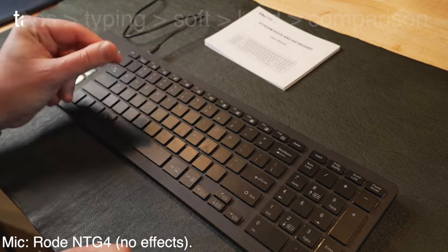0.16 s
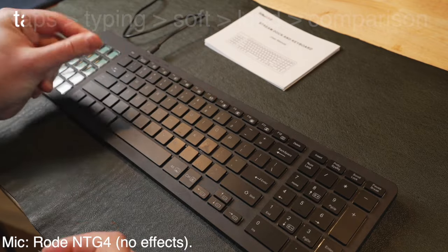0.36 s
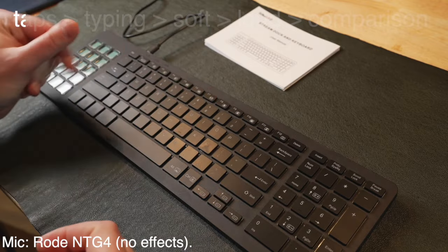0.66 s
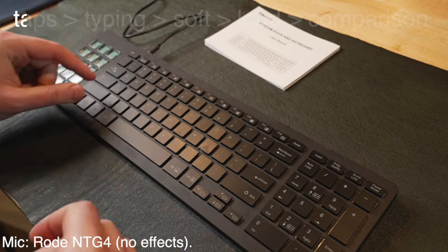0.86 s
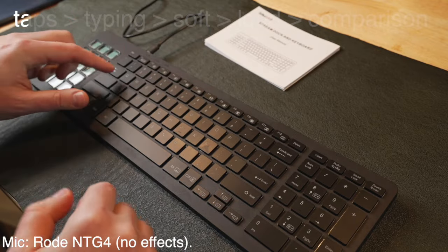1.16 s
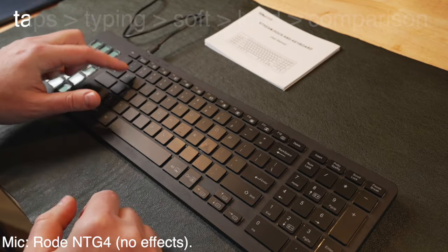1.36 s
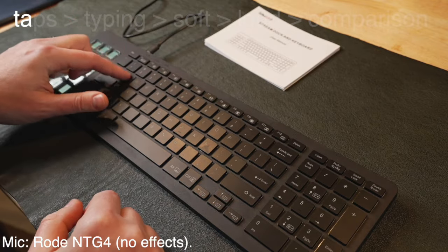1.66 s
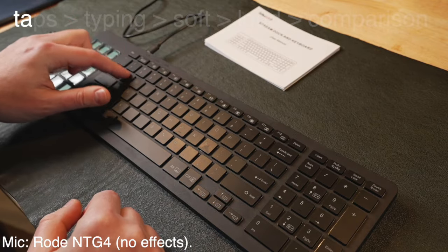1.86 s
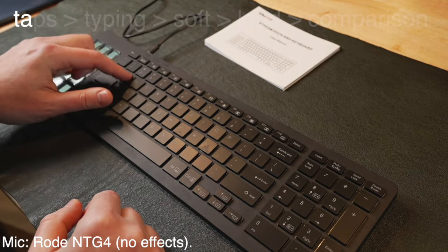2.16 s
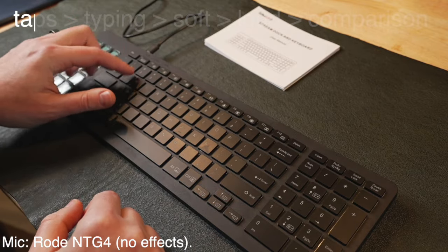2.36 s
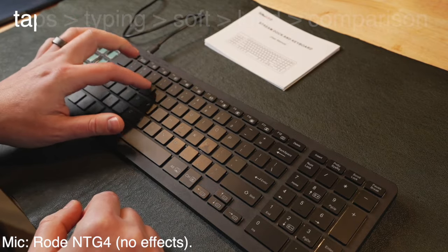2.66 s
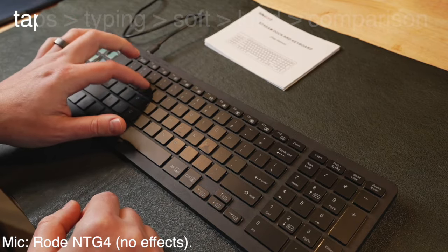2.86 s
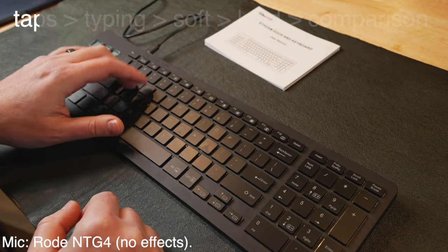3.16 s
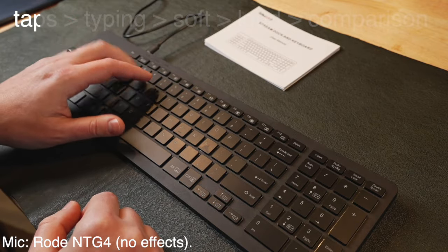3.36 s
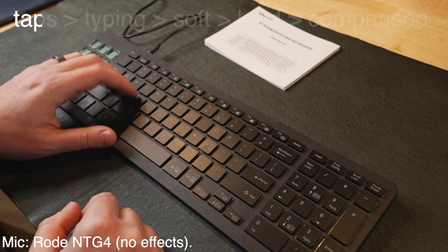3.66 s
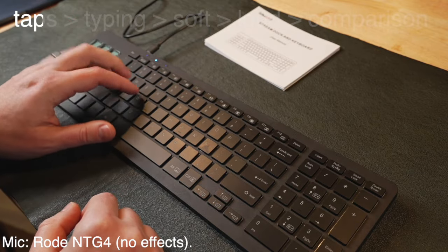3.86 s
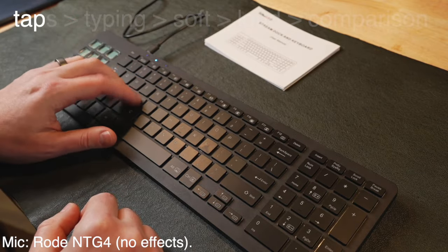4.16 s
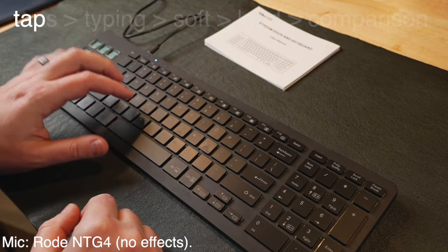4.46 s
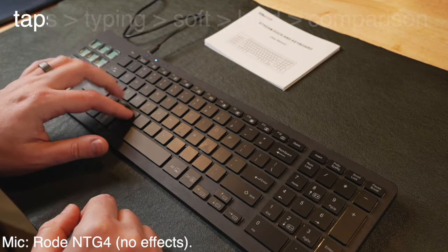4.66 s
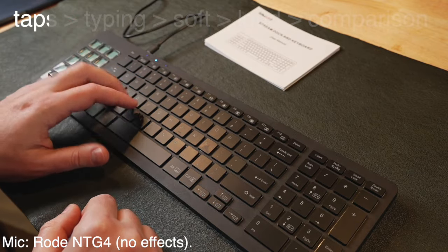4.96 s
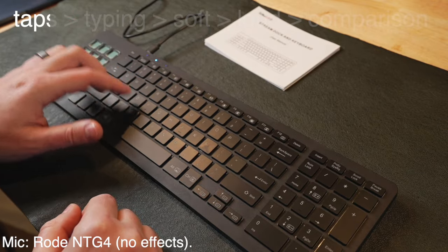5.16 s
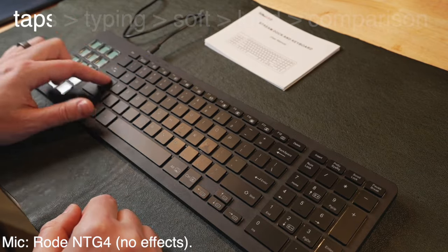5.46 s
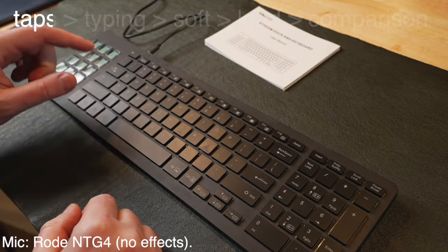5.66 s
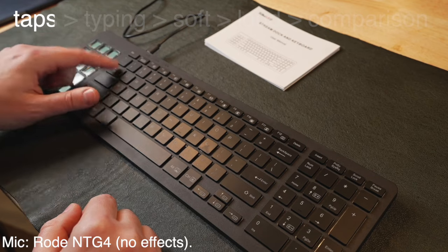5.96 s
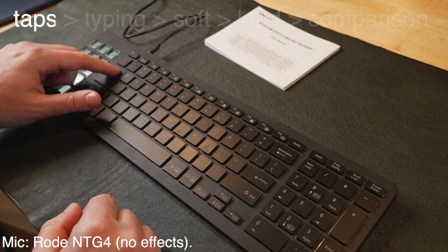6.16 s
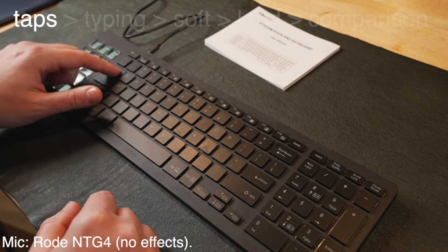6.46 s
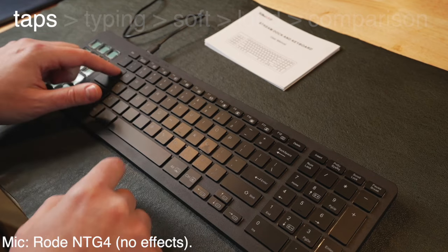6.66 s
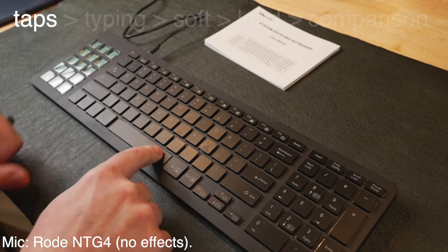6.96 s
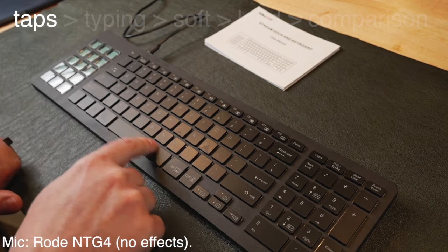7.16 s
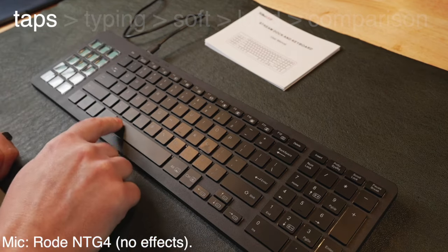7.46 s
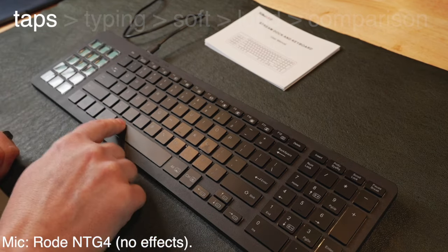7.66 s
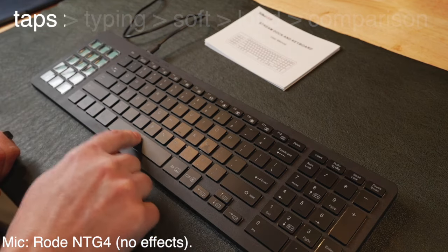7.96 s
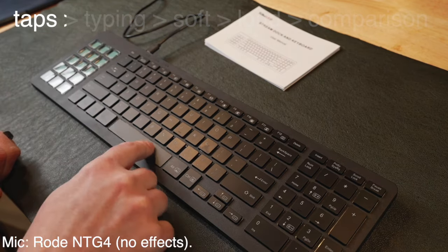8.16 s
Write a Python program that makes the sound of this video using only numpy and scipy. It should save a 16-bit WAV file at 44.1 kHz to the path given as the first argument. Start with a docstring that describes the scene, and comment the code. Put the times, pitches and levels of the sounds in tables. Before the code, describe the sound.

Three sharp finger snaps, a faint hand brush, then low-profile keyboard keys tapped softly, harder in quick rolls, and a rattling space bar, close and dry.

```python
"""Three finger snaps, each after a soft press of the fingers, crack against the palm and ring its hollow.
A hand brushes over the desk mat; then keys of a low-profile keyboard are tapped, first softly one by one,
then harder in quick rolls of several fingers: touch, bottoming out that shakes case and desk, spring back.
A wide key follows, and last the long space bar, rattling on its wire. Clicks are coloured noise bursts and
bodies are decaying sines. One close microphone in a small, dry room with still air and a faint mains hum."""
import sys
import numpy as np
from scipy import signal
from scipy.fft import rfft, irfft
from scipy.io import wavfile
from scipy.ndimage import uniform_filter1d

SR = 44100
rng = np.random.default_rng(int(sys.argv[2]) if len(sys.argv) > 2 else 0)


def int16_out(signal):
    """Quantize to a 16-bit WAV file."""
    q = np.round(np.clip(np.atleast_2d(signal).T, -1, 1) * 32767)
    wavfile.write(sys.argv[1], SR, q.astype(np.int16))


N = 366471  # samples

# Click levels are energies: 0 dB is one millisecond at full level.
# Brightness is the treble tilt in dB for each factor of five in frequency, pivoting at 5 kHz.
# keys bottom out: [t/s, click level/dB, brightness/dB, relative case knock level/dB, knock f/Hz]
KEY_STRIKES = [(1.4359, -24.5, -1.5, -42, 411), (1.6739, -21.5, 4, -42, 400), (1.8343, -33, -9, -46.5, 420),
               (2.0006, -33.5, -4.5, -46, 413), (2.135, -27, -5.5, -44, 410),
               (2.2836, -33.5, -16, -49, 408), (2.5637, -27, -17, -38.5, 691), (2.7518, -34, 2, -43.5, 720),
               (2.9316, -36, -6, -45, 690), (3.129, -14, -2.5, -33, 433), (3.1841, -24.5, -8, -38.5, 360),
               (3.2347, -33.5, 17, -40, 716), (3.3882, -15.5, -0.5, -38, 420), (3.4236, -30, 0, -44, 407),
               (3.6601, -17, 9, -42, 388.5), (3.7014, -12, 7, -28.5, 770), (3.916, -13, 7.5, -31, 683),
               (3.9472, -16.5, -0.5, -38, 750), (4.1409, -17, 0, -32.5, 754), (4.1806, -28.5, -3, -46, 364),
               (4.218, -29, -8, -46.5, 714), (4.533, -12, 0.5, -29, 725), (4.569, -23.5, 0.5, -44, 365),
               (4.7831, -17.5, -8, -35, 714), (4.8212, -22.5, 2.5, -48, 371),
               (4.993, -25.5, -4.5, -49, 700), (5.0617, -28.5, -10.5, -47, 744),
               (5.4365, -10.5, -0.5, -27.5, 755), (6.0231, -27, -2, -42, 404),
               (6.1834, -32.5, 5, -47.5, 720), (6.3469, -33.5, 6, -51, 446), (6.503, -38, -2, -49, 460),
               (6.652, -33.5, 2, -46.5, 762)]
# keys reach the top stop: [t/s, click level/dB, relative brightness/dB, relative cap ring level/dB]
KEY_RETURNS = [(1.5481, -45.5, 10, -51), (1.759, -45, 15, -51.5), (1.9078, -38, 0, -46.5),
               (2.058, -41, 16, -51.5), (2.2033, -35.5, 14, -63), (2.2279, -34.5, 24, -46.5),
               (2.3795, -31, 10, -40.5), (2.6676, -37.5, 13, -47), (2.855, -37.5, 5, -43),
               (3.048, -47.5, 0, -47.5), (3.2943, -41.5, 23, -45), (3.3337, -40, 10, -44.5),
               (3.4546, -34, 20, -44.5), (3.5011, -31, 5.5, -48), (3.5202, -35.5, 16, -44.5),
               (3.543, -42.5, -6, -43), (3.767, -39, -2, -48), (3.8137, -44.5, 6, -48.5),
               (3.8566, -44, 7, -50), (4.0195, -41, 0, -53), (4.043, -35.5, 14, -45),
               (4.27, -42.5, -4, -45), (4.291, -39.5, 15, -46.5), (4.32, -42.5, 6, -47.5),
               (4.6092, -33, 5, -52), (4.657, -29, 7, -43.5), (4.7243, -40, 12, -50.5),
               (4.866, -38, 0, -52), (4.9128, -32.5, 16, -43.5), (4.9549, -38, 13, -47.5),
               (5.0334, -22, 15.5, -49.5), (5.1472, -21, 10.5, -38.5), (5.532, -30, -2.5, -47.5),
               (6.1046, -41, 6, -54.5), (6.2745, -46, 5, -52.5), (6.424, -47.5, 19, -55.5),
               (6.59, -51, 3, -52), (6.717, -37, 11, -53.5)]
# space bar presses: [down t/s, click level/dB, relative knock level/dB, wire slack/ms,
#                     up t/s, click level/dB]
BAR_PRESSES = [(6.9859, -15, -30.5, 5.9, 7.058, -26), (7.1463, -20.5, -47, 8.7, 7.2139, -23.5),
               (7.299, -28, -55, 10.7, 7.338, -33), (7.4374, -23.5, -40, 13.2, 7.5016, -29.5),
               (7.5694, -26, -36, 16.6, 7.6475, -27.5), (7.7142, -22, -54, 11.9, 7.790, -20.5),
               (7.8719, -18, -30, 6.2, 7.9526, -28), (8.025, -24.5, -51, 9.5, 8.112, -29),
               (8.1704, -28.5, -49, 19.5, 8.245, -24), (8.316, -18, -45, 10, 8.39, -29)]
# finger snaps: [t/s, level/dB, brightness/dB, palm hollow f/Hz, hollow level relative to the snap/dB]
FINGER_SNAPS = [(.1270, -13.5, 3.5, 2060, -2), (0.3768, -9, -0.5, 2290, 5), (0.6283, -6.5, -0.5, 2280, 2.5)]
# colour of a plastic key cap, also lent to soft finger contacts: [f/Hz, level/dB]
CAP_COLOUR = [(100, -24), (400, -9.5), (800, 1.5), (1200, -7), (1800, -0.5), (2600, -2), (3300, -1.5),
              (4500, 0.5), (6500, 1.5), (8500, -2.5), (10500, -11.5), (13000, -7), (16000, -13)]

# a blow of middling force, from which other blows are reckoned
USUAL_CLICK_DB, USUAL_KNOCK_DB = -28, -43
WIDE_FROM_S = 5.9  # from here on a wide key is tapped
WIDE_TRAVEL = 1.9  # times the travel and lift time of a narrow key


def amp(db):
    """Decibels to gain."""
    return 10 ** (np.asarray(db) / 20)


def read(points, hz):
    """A table's value at hz, on a log-frequency axis."""
    f, value = np.transpose(points)
    return np.interp(np.log(hz + 1), np.log(f), value)


def add(mix, s, sound):
    """Mixes a sound in at time s."""
    part = mix[max(round(s * SR), 0):][:len(sound)]
    part += sound[:len(part)]


def unit_energy(x):
    """Scales x to the energy of one millisecond at full level."""
    return x / np.sqrt(np.sum(x ** 2) * 1000 / SR + 1e-20)


def coloured_noise(colour):
    """Steady noise shaped to a table of levels in dB per Hz."""
    hz = np.fft.rfftfreq(N, 1 / SR)
    return irfft(rfft(rng.standard_normal(N)) * amp(read(colour, hz)), N) * np.sqrt(SR / 2)


def by_force(db, usual, halves_db):
    """A duration that halves whenever the blow gets halves_db harder."""
    return usual * 2 ** ((USUAL_CLICK_DB - db) / halves_db)


def ring(modes, size=13000):
    """Struck modes, each dying at its own speed and a little different at every blow."""
    t = np.arange(size) / SR
    hz, db, t60 = np.transpose(modes)[:, :, None]
    detune, uneven = rng.standard_normal((2, len(modes), 1))
    decay = amp(db + 0.5 * uneven - 60 * t / t60)
    return (decay * np.sin(2 * np.pi * hz * (1 + 0.0046 * detune) * t)).sum(0)


def click(s, db, fade_ms, bright_db, colour, size=2048, grain_db=2.5, impact=1, spot_db=1.2):
    """One contact: a sharp impact in a burst of tiny chatter, coloured by the part struck."""
    start = size // 4
    ms = (np.arange(size) - start) * 1000 / SR
    fade_ms = max(fade_ms, 0) + 0.23  # even the hardest contact takes a moment
    shape = np.exp(np.where(ms < 0, ms / (0.43 * fade_ms), -ms / fade_ms).clip(-60, 0))
    grain = amp(grain_db * rng.standard_normal(size))
    chatter = unit_energy(shape * rng.standard_normal(size) * grain)
    chatter[start] += impact

    # the chatter drives all broad bands alike; only its fine ripple differs from blow to blow
    drive = rfft(chatter)
    drive = drive / np.sqrt(uniform_filter1d(abs(drive) ** 2, size=90) + 1e-12)
    hz = np.fft.rfftfreq(size, 1 / SR)
    tilt_db = bright_db * np.log(np.clip(hz, 1500, 12000) / 5000) / np.log(5)
    # each spot that is struck favours resonances of its own
    spot = np.interp(np.sqrt(hz / hz[-1]), np.linspace(0, 1, 24), rng.standard_normal(24))
    gain = amp(read(colour, hz) + tilt_db + spot_db * spot)
    # minimum phase: the resonances of the part ring after the contact
    phase = -signal.hilbert(np.log(np.r_[gain, gain[-2:0:-1]])).imag
    sound = irfft(drive * gain * np.exp(1j * phase[:len(hz)]))
    return s - start / SR, amp(db) * unit_energy(sound)


def knock(hz, db):
    """The plastic case rings briefly under the key."""
    # modes of the case: [multiple of the knock f, level/dB, t60/s]
    case_modes = [(.58, -26.5, 0.03), (1, -0.5, 0.025), (1.36, -8, 0.014), (1.85, -8, 0.017)]
    return amp(db) * ring([(k * hz, level, t60) for k, level, t60 in case_modes], size=5000)


def thud(db, swell_s=0.019):
    """The blow sinks through the mat and sets the desk going."""
    # modes of the keyboard on its desk: [f/Hz, level/dB, t60/s]
    desk_modes = [(32.1, -6, 0.8), (48.9, 11.5, 0.1), (77.6, 4.5, 0.15), (91.4, 1, 0.21),
                  (165.4, 10, 0.062), (181.4, -6, 0.29), (195.3, 1.5, 0.18), (270, -8, 0.047),
                  (405, -4, 0.1), (453.6, -0.5, 0.056), (561, -17, .09), (730.5, -5, 0.11)]
    sound = ring(desk_modes)
    return -amp(db) * sound * (1 - np.exp(-np.arange(len(sound)) / SR / swell_s))


def strikes(knock_db=7, rasp_db=-13, rasp_lead_s=0.0046):
    """Keys rasp down their hinges and hit the bottom: click, knock of the case, thud of the desk."""
    out = np.zeros(N)
    for s, db, bright_db, case_db, hz in KEY_STRIKES:
        add(out, *click(s - rasp_lead_s, db + rasp_db, 0.6, 1.2, CAP_COLOUR))
        contact_ms = by_force(db, usual=1, halves_db=12)  # harder blows make shorter contact
        add(out, *click(s, db, contact_ms, bright_db, CAP_COLOUR))
        add(out, s - .001, knock(hz, case_db + knock_db))
        thud_db = -43 + 0.48 * (db - USUAL_CLICK_DB) + 0.21 * (case_db - USUAL_KNOCK_DB)
        add(out, s, thud(thud_db))
    return out


def returns(ring_db=5, cap_t60=0.068, thud_db=-6, tilt_db=-1, scatter=0.086):
    """Freed caps spring up and ring hollow, with no finger to damp them."""
    out = np.zeros(N)
    for s, db, bright_db, cap_db in KEY_RETURNS:
        add(out, *click(s, db, 1.04, bright_db + tilt_db, CAP_COLOUR))
        usual_hz = 433 if s > WIDE_FROM_S else 586  # the wide cap is deeper
        hz = usual_hz * (1 + scatter * (2 * rng.random() - 1))
        # no two caps ring alike
        low, high, edge = hz * np.array([.8, 1.28, 4.6]) * rng.uniform(0.905, 1.09, 3)
        modes = [(hz, -1.5, cap_t60), (low, -4, .04), (high, -4, .04), (edge, -9, .035)]
        add(out, s - .002, amp(cap_db + ring_db) * ring(modes, size=6000))
        add(out, s, thud(cap_db + thud_db))
    return out


def cap_bounces(db=-7, earliest_s=0.003, latest_s=0.013, fade_ms=1.15, tilt_db=-9):
    """A returning cap rebounds once from its top stop, softer and duller."""
    out = np.zeros(N)
    for s, click_db, bright_db, _ in KEY_RETURNS:
        bounce_s = s + rng.uniform(earliest_s, latest_s)
        add(out, *click(bounce_s, click_db + db, fade_ms, bright_db + tilt_db, CAP_COLOUR))
    return out


def touches(uneven=0.19):
    """Light ticks as a fingertip meets the cap before each strike and leaves it before each return."""
    out = np.zeros(N)
    # (travel multiple, level dB, fade ms, brightness dB); the wide key is slower and duller
    narrow = (1, -32.5, 0.75, 17)
    wide = (WIDE_TRAVEL, -35, 0.98, 6.5)
    for s, db, *_ in KEY_STRIKES:
        slower, touch_db, fade_ms, bright_db = wide if s > WIDE_FROM_S else narrow
        # harder blows travel faster
        lead_ms = slower * by_force(db, usual=6, halves_db=15.5)
        touch_db = touch_db + 0.18 * (db - USUAL_CLICK_DB)
        add(out, *click(s - lead_ms / 1000, touch_db, fade_ms, bright_db, CAP_COLOUR))
    for s, db, *_ in KEY_RETURNS:
        slower = WIDE_TRAVEL if s > WIDE_FROM_S else 1
        lead_ms = slower * 3.3 * (1 + uneven * (2 * rng.random() - 1))
        lift_db = -35.5 + 0.63 * (db - USUAL_CLICK_DB)
        add(out, *click(s - lead_ms / 1000, lift_db, 0.51, 30.5, CAP_COLOUR))
    return out


def hinges(db=-43, spread_db=6, fade_ms=0.5, bright_db=8, earliest_s=0.029, latest_s=0.0042):
    """As the finger eases off, the cap shifts in its hinge with a faint tick."""
    out = np.zeros(N)
    for s, *_ in KEY_RETURNS:
        when, softer = rng.random(2)
        lead_s = latest_s + when * (earliest_s - latest_s)
        add(out, *click(s - lead_s, db - spread_db * softer, fade_ms, bright_db, CAP_COLOUR))
    return out


def wide_key_rattle(rub_lead_s=0.004, earliest_s=.032, latest_s=.046):
    """The wide key rubs on its way down and rocks in its guides while it is held."""
    out = np.zeros(N)
    for s, *_ in KEY_STRIKES:
        if s > WIDE_FROM_S:
            add(out, *click(s - rub_lead_s, -39, 4, -10, CAP_COLOUR))
            add(out, *click(s + rng.uniform(earliest_s, latest_s), -41, 0.92, 0, CAP_COLOUR))
    return out


def bar_stops():
    """Each press hits the lower stop, then the upper: (s, click dB, knock dB, slack ms, kind of stop)."""
    # kind of stop: (contact fade ms, brightness dB, wire dB at usual force, wire fade ms)
    lower, upper = (2.8, -5.5, -28.5, 1.6), (3.5, -1, -28.5, 13.5)
    downs = [(s, db, case_db, slack_ms, lower) for s, db, case_db, slack_ms, _, _ in BAR_PRESSES]
    ups = [(s, db, db - 20, 5.6, upper) for *_, s, db in BAR_PRESSES]
    return downs + ups


def space_bar(knock_db=2, knock_hz=480, wire_tilt_db=1, loose_from_s=0.015, loose_to_s=.035):
    """The bar clacks on its stops; its wire takes up slack just before and chatters at release."""
    # colour of the long bar and its wire: [f/Hz, level/dB]
    bar_colour = [(100, -15), (400, 0), (1000, -6), (1500, -10), (2300, -5), (3100, -6.5), (4000, 0),
                  (4900, 7.5), (5700, 2.5), (6700, 3), (8500, -2.5), (11000, -8), (14000, -6.5),
                  (16000, -19)]
    out = np.zeros(N)
    for s, db, case_db, slack_ms, (fade_ms, bright_db, wire_db, wire_ms) in bar_stops():
        force_db = db - USUAL_CLICK_DB
        wire_s = s - slack_ms / 1000
        add(out, *click(wire_s, wire_db + 0.52 * force_db, wire_ms, wire_tilt_db, bar_colour))
        add(out, *click(s, db, fade_ms, bright_db, bar_colour))
        # the long bar is well damped, with modes spread over the low middle
        hz = knock_hz * (1 + 0.098 * rng.standard_normal())  # the pitch varies a little from stop to stop
        modes = [(0.565 * hz, -2, .035), (hz, -3, .02), (1.51 * hz, -1.5, .02), (2 * hz, -5, .015)]
        add(out, s - .001, amp(case_db + knock_db) * ring(modes, size=4000))
        add(out, s, thud(-46 + 0.5 * force_db))
    for *_, up_s, _ in BAR_PRESSES:
        loose_s = up_s - rng.uniform(loose_from_s, loose_to_s)
        add(out, *click(loose_s, -36, 0.53, wire_tilt_db, bar_colour))
    return out


def loose_caps(db=-15, spread_s=0.024, loudest_db=-39, bright_db=-3, count=3):
    """After each blow the caps near by chatter softly in their hinges."""
    out = np.zeros(N)
    for s, blow_db, *_ in KEY_STRIKES + KEY_RETURNS + bar_stops():
        for delay, softer, length, bright in rng.random((count, 4)):
            tick_s = s + .004 + spread_s * delay ** 2
            tick_db = min(blow_db + db, loudest_db) - 8 * softer
            add(out, *click(tick_s, tick_db, 1 + 3 * length, bright_db + 8 * bright, CAP_COLOUR))
    return out


def snaps(push_db=-43, slide_db=-36):
    """The finger slides off the thumb and slaps the palm with a crack."""
    # colour of skin on skin: [f/Hz, level/dB]
    skin_colour = [(100, -25.5), (350, -16.5), (650, -5.5), (1300, -7), (1950, 3), (2700, 2), (3500, -6),
                   (4450, 9), (5100, 1), (5900, 7.5), (7000, -5.5), (10500, -1.5), (12200, -6.5),
                   (14200, -5), (16000, -17)]
    # fingers press together before each snap: [t/s, level/dB, fade before the minimum is added/ms,
    #                                           brightness/dB]
    grips = [(0.0667, -37, 0.54, -4), (.3243, -36.5, 0.6, -7.5), (0.5688, -33, .3, -6)]
    out = np.zeros(N)
    for s, db, bright_db, _, _ in FINGER_SNAPS:
        add(out, *click(s - .012, db + slide_db, 5.646, 11, CAP_COLOUR))
        add(out, *click(s, db, .3, bright_db, skin_colour, grain_db=1.5, impact=2, spot_db=.5))
        pushed_air = ring([(48, 1.5, 0.17), (85, -2.5, 0.066), (190, 0.5, .04)])
        add(out, s, amp(push_db) * pushed_air)
    for s, db, fade_ms, bright_db in grips:
        add(out, *click(s, db, fade_ms, bright_db, CAP_COLOUR))
        flesh_bump = ring([(60, 0, 0.1306), (170, -3.5, 0.045)])
        add(out, s, amp(db - 6.5) * flesh_bump)
    return out


def palm_hollows(fill_s=0.00041):
    """At each snap the hollow under the curled fingers rings for a few cycles."""
    out = np.zeros(N)
    for s, db, _, hz, ring_db in FINGER_SNAPS:
        hollow = ring([(hz, 0, .007), (.87 * hz, -10, .005), (1.17 * hz, -15, .005)], size=3000)
        hollow *= 1 - np.exp(-np.arange(len(hollow)) / SR / fill_s)  # the hollow fills within a cycle
        add(out, s - .0004, amp(db + ring_db) * unit_energy(hollow))
    return out


def hand_slide(from_s=0.76, to_s=1.32):
    """A hand brushes faintly over the mat as it settles in front of the keyboard."""
    # colour of the rub at its strongest: [f/Hz, level/dB per Hz]
    mat_colour = [(100, -112), (600, -103), (1200, -111), (3500, -108), (7000, -114), (10000, -117),
                  (16000, -128)]
    way = np.clip((np.arange(N) / SR - from_s) / (to_s - from_s), 0, 1)
    return coloured_noise(mat_colour) * np.sin(np.pi * way)


def room(x, t60, wet_db, early_db, early_s, size=16000):
    """Dense echoes: strong early ones from the desk and things near by, then a short tail."""
    # colour of all echoes: [f/Hz, level/dB]
    echo_colour = [(100, -1), (500, 8.5), (1200, 0.5), (2600, -2.5), (3400, -1.5), (5000, -3.5), (8000, -7),
                   (11000, -7.5), (16000, 4)]
    hz, t, z = signal.stft(rng.standard_normal(size), SR, nperseg=256)
    z = z * amp(read(echo_colour, hz)[:, None] - 60 * t / read(t60, hz)[:, None])
    tail = signal.istft(z, SR, nperseg=256)[1]
    t = np.arange(len(tail)) / SR
    early = 1 + amp(early_db) * np.exp(-t / early_s)
    onset = np.clip(t / 0.0018, 0, 1)
    tail = tail / np.linalg.norm(tail) * early * onset
    return amp(wet_db) * signal.oaconvolve(x, tail)[:N]


def keyboard_echoes(x, count=3, turn_hz=1.3):
    """Three echo patterns blend in turn over time, so that successive blows do not share one tail."""
    # decay of the echoes around the desk: [f/Hz, t60/s]
    desk_t60 = [(200, .18), (700, .17), (2200, .23), (5000, .22), (9000, .18), (15000, .13)]
    turn = 2 * np.pi * turn_hz * np.arange(N) / SR
    out = np.zeros(N)
    for k in range(count):
        # the shares of the echo patterns turn in time, at constant total power
        share = np.cos(turn + np.pi * k / count) * np.sqrt(2 / count)
        out += room(x * share, desk_t60, wet_db=-12.5, early_db=4, early_s=.006)
    return out


def wall_echoes(crack, hollow):
    """Walls return the snaps; the palm's ring spreads widely and reaches them more than the crack."""
    # decay of echoes from the far walls after a snap in the open: [f/Hz, t60/s]
    far_t60 = [(200, 0.19), (1200, 0.085), (2300, 0.21), (4500, 0.2), (6500, 0.18), (9000, 0.22),
               (15000, 0.064)]
    walls = room(crack, far_t60, wet_db=-14.5, early_db=-5, early_s=.014)
    return walls + room(hollow, far_t60, wet_db=-13, early_db=-4, early_s=0.0087)


def air(hum_hz=120, hum_db=-68):
    """Steady room noise, strongest in the bass, and mains hum as one sine of RMS level hum_db."""
    # still air of the room: [f/Hz, level/dB per Hz]
    air_colour = [(10, -90.5), (25, -80.5), (60, -86), (100, -91), (160, -99.5), (300, -99), (450, -99),
                  (580, -102), (720, -99), (900, -109), (2000, -109), (4000, -114), (8000, -119),
                  (16000, -123)]
    hum = amp(hum_db) * np.sqrt(2) * np.sin(2 * np.pi * hum_hz * np.arange(N) / SR)
    return coloured_noise(air_colour) + hum


def scene():
    """Keyboard and hand close to the microphone, with their echoes, over the air of the room."""
    keys = strikes() + returns() + cap_bounces() + touches() + hinges() + wide_key_rattle()
    keys += space_bar() + loose_caps()
    crack, hollow = snaps(), palm_hollows()
    hand = crack + hollow + hand_slide()
    echoes = keyboard_echoes(keys) + wall_echoes(crack, hollow)
    return (keys + hand + echoes + air())[None]


def record(dry):
    """Peaks beyond full scale are clipped; then a low-pass sets the band limit at 16.2 kHz."""
    clipped = np.clip(dry, -1, 1)
    low_pass = signal.firwin(255, 16200, window=("kaiser", 8), fs=SR)
    return signal.oaconvolve(clipped, low_pass[None], "same")


dry = scene()
out = record(dry)
int16_out(out)
```